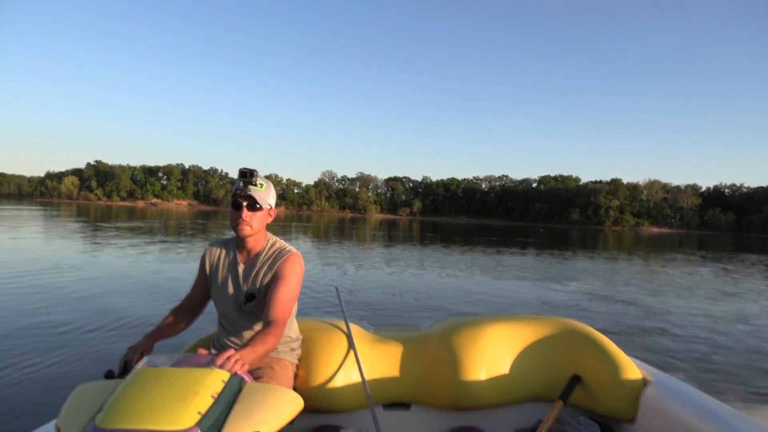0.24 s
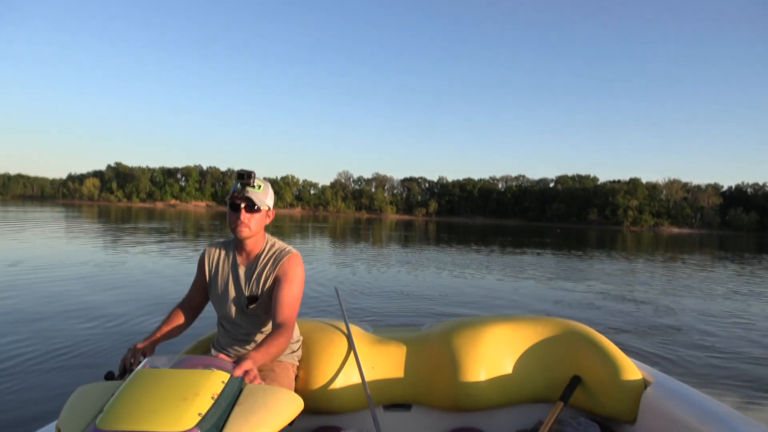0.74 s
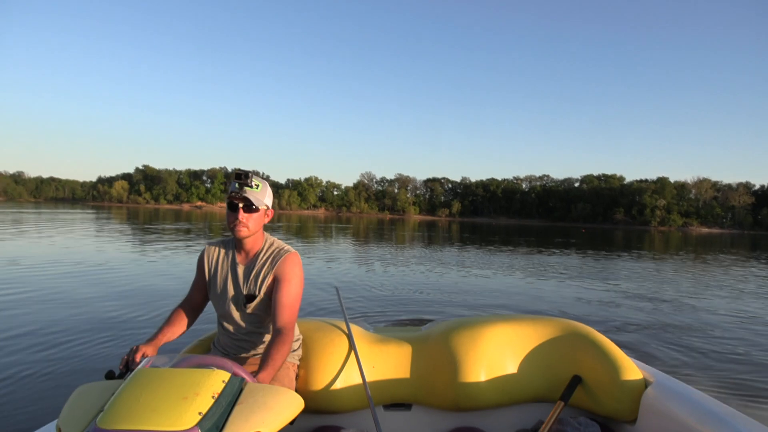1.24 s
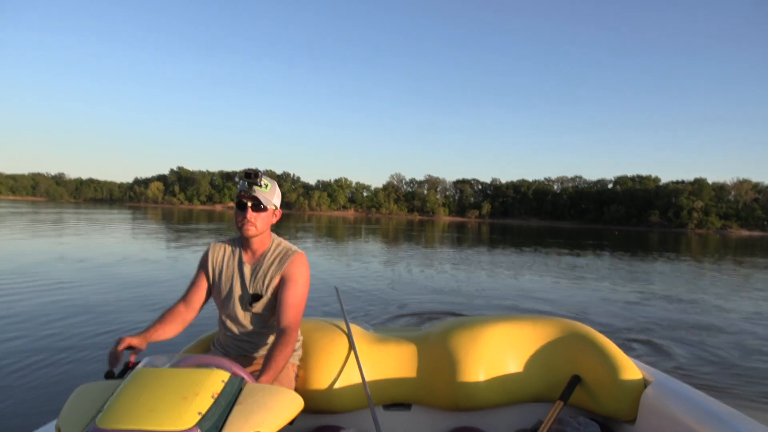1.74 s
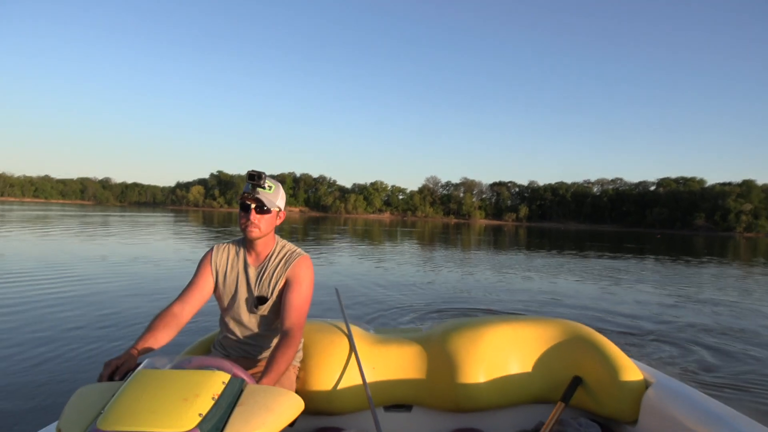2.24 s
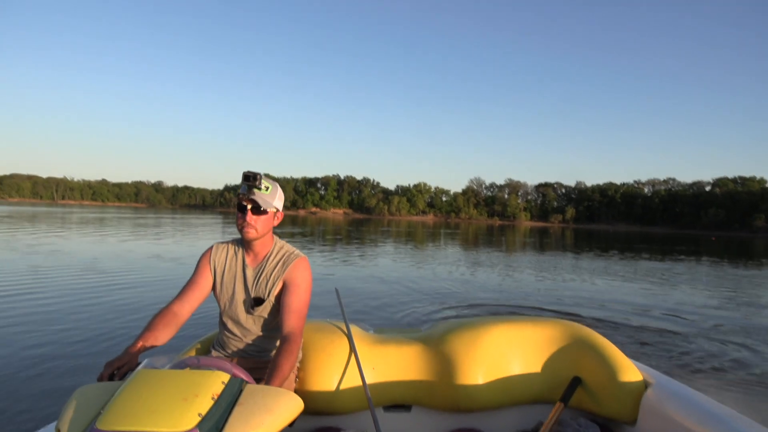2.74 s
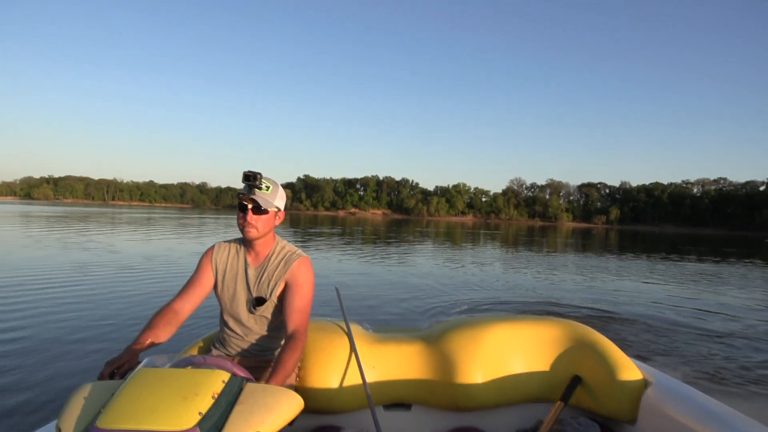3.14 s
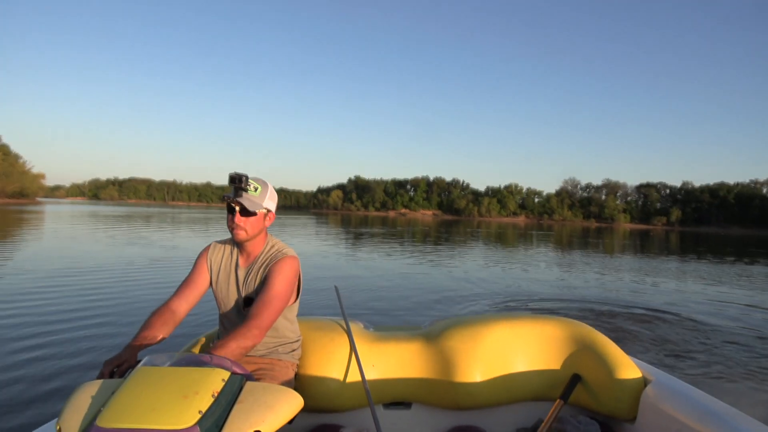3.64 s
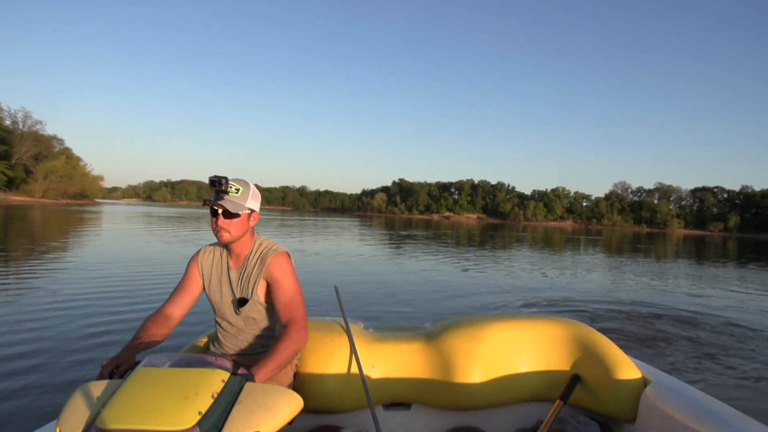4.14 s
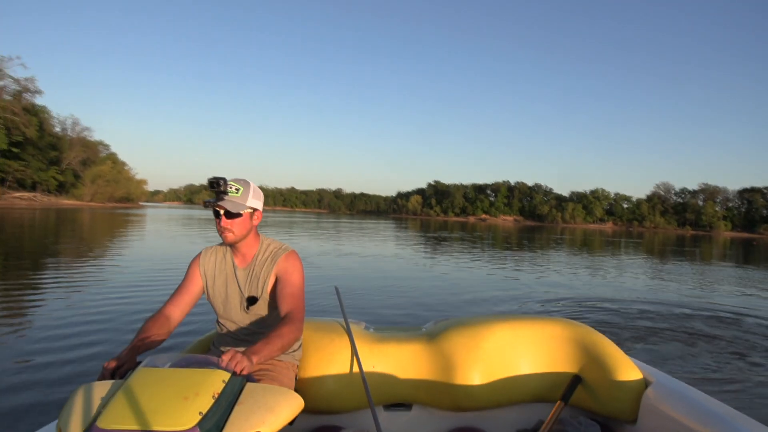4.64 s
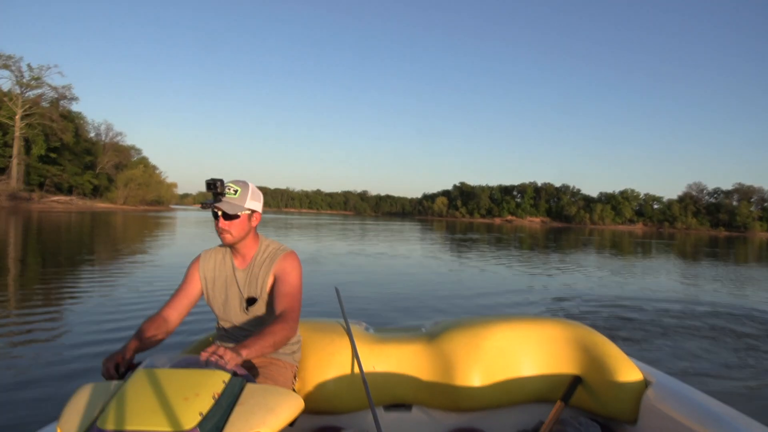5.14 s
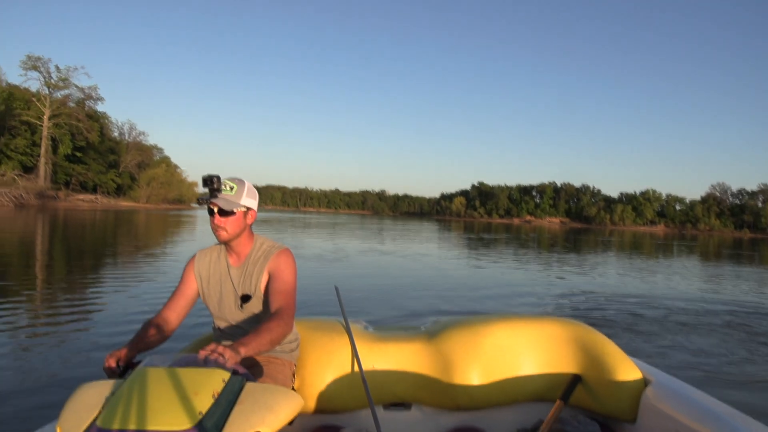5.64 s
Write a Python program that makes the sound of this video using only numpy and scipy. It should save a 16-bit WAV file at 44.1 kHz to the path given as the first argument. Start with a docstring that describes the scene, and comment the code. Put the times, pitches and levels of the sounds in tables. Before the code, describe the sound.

A steady boat engine throbs through hull and deck panels, swelling and fluttering without really changing speed. A shaken fitting ticks dryly and irregularly, with light churn and bubbling behind. A brief clatter comes around 4 seconds, then a sharper clack at 4.5; afterwards the ticks thin briefly and return regularly. Close, dry onboard sound outdoors, bass-heavy, with limiter distortion.

```python
"""An idling jet boat drones through its hull on a calm river: uneven firings and flow noise drive
resonances of hull, exhaust and deck panels, with steady tones, swells and low thumps on top.
Water fizzes at the stern as coloured noise and bubble blips; deck hardware buzzes.
Loose gear knocks, and a fitting shaken by the engine ticks: short noise bursts with decaying tones.
The loud drone drives the small microphone into its limiter and clipping."""
import sys
import numpy as np
from scipy.fft import rfft, irfft, next_fast_len
from scipy.io import wavfile
from scipy.ndimage import uniform_filter1d, minimum_filter1d, map_coordinates

SR = 44100
rng = np.random.default_rng(int(sys.argv[2]) if len(sys.argv) > 2 else 0)


def dump_mix(stems):
    """Bounce the given channels to the path in sys.argv[1] as a 16-bit WAV at rate SR."""
    frames = np.atleast_2d(stems).T  # one column per channel
    limited = np.clip(frames, -1, 1)  # hard clip at full scale
    pcm = np.round(limited * 32767).astype(np.int16)
    wavfile.write(sys.argv[1], SR, pcm)


N = 259308

FIRING_HZ = 58.13  # mean rate

# Water levels over time. Each row: time in seconds, spray, mist and churn level in dB.
WASH = [(0.0, -45, -59.5, -33), (0.55, -45.5, -63, -33.5), (0.82, -42.5, -57.5, -30.5),
        (1.1, -45.5, -61.5, -34.5), (1.4, -46, -56, -32.5), (1.82, -46, -62.5, -34), (2.2, -45, -61, -34),
        (2.6, -44, -62, -33), (3.55, -41.5, -58, -30.5), (3.94, -43, -55.5, -33), (3.97, -38, -53, -29),
        (4.16, -42, -55, -33), (4.47, -40.5, -54, -31.5), (4.72, -44.5, -56.5, -33), (4.87, -44, -57, -34),
        (5.04, -43.5, -52.5, -32), (5.2, -45, -58, -34), (5.4, -44.5, -57, -33), (5.65, -44.5, -54, -33),
        (5.88, -43.5, -56, -30.5)]


def amp(db):
    """dB to gain."""
    return 10 ** (np.asarray(db) / 20)


def unit(x):
    """Scaled to rms 1."""
    return x / np.sqrt(np.mean(x ** 2) + 1e-20)


def curves(rows):
    """One value per sample for each column after the time."""
    s, *cols = np.transpose(rows)
    return [np.interp(np.arange(N) / SR, s, c) for c in cols]


def wobble(rate):
    """A smooth random curve, rate knots a second."""
    knots = rng.standard_normal(int(N * rate / SR) + 4)
    return map_coordinates(knots, [np.arange(N) * rate / SR])


def filtered(x, response):
    """x times a complex response of frequency."""
    m = next_fast_len(N + SR // 2)
    return irfft(rfft(x, m) * response(np.fft.rfftfreq(m, 1 / SR)), m)[..., :N]


def colour(points):
    """Gain of (Hz, dB) points on a log frequency axis, -120 dB outside."""
    f, db = np.transpose(points)
    log_f = np.log(f + 1)
    return lambda hz: amp(np.interp(np.log(hz + 1), log_f, db, left=-120, right=-120))


def modes(table):
    """Causal response of (Hz, width Hz, dB) resonances, summed with alternating sign."""
    def response(f):
        total = 0
        for k, (c, w, db) in enumerate(table):
            total = total + (-1) ** k * amp(db) * 1j * f * w / (c * c - f * f + 1j * f * w)
        return total
    return response


def steady(x, span_s):
    """x with its slow level drift evened out by a running rms over span_s."""
    return x / np.sqrt(np.abs(uniform_filter1d(x ** 2, size=int(span_s * SR))) + 1e-9)


def add_at(track, s, piece):
    """Adds a piece to the track, starting at s seconds."""
    track[round(s * SR):][:len(piece)] += piece


def water():
    """Churn, spray and mist: noise bands that share level lumps and part of a grainy noise."""
    # Spectra of the three bands. Each row: frequency in Hz, relative gain in dB.
    churn, spray, mist = [(350, -10.5), (600, 0), (717, 1), (883, 1), (1350, -13.5), (1480, -36.5),
                          (1900, -38), (2470, -33), (4180, -120)], [(900, 0), (1500, 6.5), (1800, 6.5), (2500, -0.5), (2800, 0.5),
                                         (2970, -0.5), (3200, -2.5), (4300, -6), (4750, -7.5),
                                         (5200, -24.5), (6500, -40), (8450, -44)], [(3240, -23.5), (5500, 3.5), (6420, -1), (7460, -1),
                                                        (10800, -9.5), (13200, -21), (15800, -58)]
    spray_db, mist_db, churn_db = curves(WASH)
    lump = wobble(45)
    drops = unit(rng.standard_normal(N) * amp(5.5 * np.tanh(wobble(350) / 2.4)))
    bands = (  # level dB, spectrum, lump scale dB, share of drops
        (churn_db, churn, 1.8, .15),
        (spray_db, spray, 1.5, .35),
        (mist_db, mist, 1.5, .6))
    out = 0
    for level_db, spectrum, lump_db, share in bands:
        noise = filtered(rng.standard_normal(N) + share * drops, colour(spectrum))
        out = out + amp(level_db + lump_db * lump + 0.47 * wobble(22.16)) * unit(noise)
    return out


def bubbles():
    """Gurgle of small bubbles: soft sine blips that rise in pitch, following the spray level."""
    bubbles_per_s, start_hz, pitch_spread = 60, 3102, .25  # spread in log pitch
    life_cycles, level_db = 22, 1.5  # level re spray
    count, i = int(N / SR * bubbles_per_s), np.arange(SR // 40)
    at, draw = rng.integers(0, N, (count, 1)), rng.standard_normal((count, 2))
    cycles = start_hz * np.exp(pitch_spread * draw[:, :1]) * i / SR
    life = cycles / life_cycles
    envelope = amp(4.3 * draw[:, 1:]) * 8 * life * np.exp(-4 * life)
    blips = envelope * np.sin(2 * np.pi * cycles * (1 + .06 * life))
    track = np.bincount((at + i).ravel(), blips.ravel(), N + SR)[:N]
    return amp(curves(WASH)[0] + level_db) * track


def buzz():
    """Dense contacts (uneven noise) ring deck hardware, each part in its own fits; level follows spray."""
    # Hardware resonances. Each row: frequency in Hz, width in Hz, relative level in dB.
    hardware = [(1326, 110, 4.5), (1770, 130, 0), (2210, 65, 1), (2916, 79, 0.5), (3100, 170, -2),
                (3850, 200, -6), (4665, 98, -5), (5100, 56, -10.5), (5600, 150, -27), (7160, 160, -23)]
    unevenness_db = 9 * np.tanh(wobble(220) / 1.5) + 3.5 * np.tanh(wobble(30) / 1.5)
    contacts = rng.standard_normal(N) * amp(unevenness_db)
    parts = sum(amp(3 * wobble(30)) * filtered(contacts, modes([mode])) for mode in hardware)
    ring = filtered(parts, lambda hz: 1 / (1 + (1100 / (hz + 1)) ** 4) / (1 + (hz / 8000) ** 4))
    return amp(curves(WASH)[0] - 4.0) * unit(ring)


def clanks():
    """Loose gear knocks: a short noise clatter with a brief decaying sine at each knock's pitch."""
    # Knocks. Each row: start in seconds, level in dB, clatter T60 in seconds, ring pitch in Hz.
    knocks = [(1.459, -24, .03, 3100), (3.9584, -13, 0.075, 5300), (3.961, -21, 0.081, 2300),
              (3.967, -19.5, 0.088, 1190), (3.978, -25, 0.092, 1500), (4.017, -14.5, 0.087, 2800),
              (4.029, -23, 0.13, 3080), (4.057, -20, 0.13, 3080), (4.086, -18, 0.1, 1900),
              (4.102, -23, .09, 1200), (4.146, -21, 0.056, 1400), (4.512, -6.5, 0.033, 5300),
              (4.514, -9.5, .04, 690), (4.5155, -15, 0.023, 3650), (4.5177, -11.5, 0.07, 1320),
              (4.521, -13.5, .05, 2470), (4.523, -18, .04, 1910), (4.533, -18, 0.2, 1990),
              (4.575, -15.5, 0.043, 3860), (4.5762, -16, .04, 4720), (4.579, -17, .04, 2840),
              (4.578, -19, .04, 850), (4.584, -23, 0.083, 2010), (4.632, -23, .08, 2120)]
    # Clatter spectrum. Each row: frequency in Hz, relative gain in dB.
    spectrum = [(400, -4), (900, -1), (1600, -2.5), (2400, -3), (3500, -10), (5300, -8.5), (6500, -14.5),
                (9000, -20)]
    clatter_db, ring_db = -18.5, -6  # re knock level
    ring_cycles = 33  # cycles to -60 dB
    clatter, ring, t = np.zeros(N + SR), np.zeros(N + SR), np.arange(SR // 5) / SR
    rise = 1 - np.exp(-t / 0.00071)
    for s, db, t60, hz in knocks:
        add_at(clatter, s, rise * amp(db + clatter_db - 60 * t / t60))
        ring_gain = rise * amp(db + ring_db - 60 * t * hz / ring_cycles)
        add_at(ring, s, ring_gain * np.sin(2 * np.pi * hz * t))
    noise = unit(filtered(rng.standard_normal(N), colour(spectrum)))
    return clatter[:N] * noise + ring[:N]


def faint_ticks():
    """Light contacts at random, at most one per mean firing period, in the columns of the firm ones."""
    contacts_per_s, scatter_db = 9, 1.5
    level_db, body_db, edge_db = -44.5, 8, -15  # body and edge re level
    count = int(N / SR * FIRING_HZ)
    chance, draw = rng.random((count, 2)), rng.standard_normal((count, 3))
    s = (np.arange(count) + chance[:, 1] / 2) / FIRING_HZ
    levels_db = [level_db, body_db, edge_db] + scatter_db * draw
    kept = chance[:, 0] < contacts_per_s / FIRING_HZ
    return list(np.column_stack([s, levels_db])[kept])


def ticks():
    """A fitting's contacts: noise burst of a few ms, one bounce, tail, and modes of random strength."""
    # Firm contacts. Each row: start in seconds, level in dB, body and edge in dB re level.
    firm = [(0.0513, -25, -3, -11.5), (0.069, -38, 2, -15.5), (0.0892, -32.5, -5, -13),
            (0.1174, -39, 8.5, -11.5), (0.164, -38, -4, -13.5), (0.2076, -30.5, -7, -12),
            (0.248, -38.5, 5, -16), (0.266, -39.5, 7, -16), (0.3575, -33, -0.5, -13.5),
            (0.3795, -35, -11.5, -21.5), (0.3995, -46, 7, -17), (0.4469, -40.5, 1, -14),
            (0.496, -33.5, 2, -15.5), (0.506, -38.5, 5, -15), (0.516, -37.5, 7.5, -13.5),
            (0.6522, -39.5, 5, -15.5), (0.669, -43.5, 9, -16), (0.7068, -50, 4, -20),
            (0.7868, -28.5, -5, -13), (0.827, -37, 9.5, -13), (0.905, -33, 5.5, -12.5),
            (0.97, -47, -2, -13), (0.9926, -39, 0, -17), (1.0954, -40, 5, -16.5), (1.1927, -38, 6, -16.5),
            (1.2342, -34, 3.5, -17.5), (1.203, -44.5, 7, -19.5), (1.2625, -37.5, 2, -21),
            (1.349, -40.5, 12, -18), (1.356, -44, 8, -18), (1.388, -41, 1, -17.5), (1.4531, -39, 9, -17.5),
            (1.4852, -35, 2, -12), (1.508, -26.5, -10, -9.5), (1.571, -37, 0.5, -17),
            (1.6093, -34, -2, -15), (1.624, -39, 7, -12.5), (1.729, -42, 7.5, -16.5),
            (1.8063, -45, -1.5, -14), (1.8582, -40.5, 6.5, -18), (1.907, -45, 0, -14),
            (2.0098, -42.5, 3, -15), (2.029, -41, -2, -15), (2.0567, -40, 6, -17), (2.1044, -26, -8, -12),
            (2.149, -40, -5, -14), (2.1778, -44, 8, -8.5), (2.2039, -33.5, -9, -14),
            (2.2493, -35.5, -11, -13.5), (2.3141, -34.5, -1, -14.5), (2.36, -38, -2, -17.5),
            (2.6269, -36, -2, -11), (2.64, -38.5, 6, -17.5), (2.654, -49, -3, -21), (2.7227, -37, 4, -16),
            (2.752, -38.5, 7, -14), (2.851, -22.5, -7, -13), (2.8809, -37.5, -10.5, -9.5),
            (2.9034, -28.5, -20, -16), (2.964, -37, -6, -21), (3.019, -32, -4, -14),
            (3.046, -29, -12, -13.5), (3.1403, -28, -8.5, -15.5), (3.1922, -29.5, -12, -12.5),
            (3.249, -29.5, -15, -13.5), (3.294, -29, -1, -12), (3.3508, -35, -12, -18),
            (3.359, -34, -6, -16), (3.4038, -28.5, -1, -11), (3.454, -31, -8, -18), (3.5044, -40, 6, -21),
            (3.5525, -37, 5, -19), (3.614, -33.5, 2.5, -10), (3.6376, -25, -6, -14), (3.688, -31, -1, -12),
            (3.703, -34.5, 1, -15.5), (3.7229, -35, -6, -14), (3.748, -30, 5.5, -10),
            (3.788, -26.5, -2, -17), (3.8402, -35.5, -3, -12), (3.9594, -30, -9, -15),
            (3.9968, -26.5, -3, -8.5), (4.0164, -35.5, -5, -13), (4.029, -43, 0, -16), (4.0577, -37, 4, -8),
            (4.0855, -27.5, -7, -7), (4.104, -37, 3, -11), (4.13, -34, 3.5, -12.5), (4.149, -38, 2, -12.5),
            (4.179, -34, -10, -15.5), (4.194, -38.5, -3, -10), (4.2238, -33, -10, -21),
            (4.2443, -31.5, -2, -16.5), (4.259, -36, -2, -14), (4.2786, -31.5, -7, -14.5),
            (4.322, -40, 0, -12.5), (4.339, -39, 0, -15), (4.392, -40.5, 4, -16), (4.4139, -35, 0, -9.5),
            (4.438, -39.5, 2, -14), (4.4715, -30.5, -5, -12), (4.486, -32, -1, -12),
            (4.5106, -23, -11, -21.5), (4.5755, -30.5, 3, -25), (4.6244, -31, -4, -14.5),
            (4.9082, -36, -5, -16), (4.9606, -34.5, -6, -12), (5.0723, -29.5, -0.5, -13),
            (5.1277, -29, -9, -12), (5.231, -43, -2, -14), (5.3103, -30, -4, -11), (5.3792, -39, -7, -10.5),
            (5.392, -43, -3.5, -7), (5.4156, -33.5, 0, -16.5), (5.473, -32.5, -3, -8),
            (5.5253, -30.5, -4, -12), (5.5733, -31.5, -13, -14), (5.6238, -28, -8, -12),
            (5.675, -28.5, -4, -14), (5.7277, -28.5, -11, -13), (5.7786, -30.5, -5, -12.5),
            (5.8325, -28, -7, -12)]
    # Fitting modes. Each row: frequency in Hz, relative level in dB, T60 in seconds.
    fitting = [(1376, 2.5, 0.039), (1870, 0, 0.043), (2250, -16, 0.036), (3120, -8.5, 0.03),
               (3500, -7, 0.04), (4430, -15.5, 0.061), (5500, -9, 0.044), (6750, -22, 0.012),
               (7430, -6.5, 0.037), (10100, 2, 0.012), (10500, -6, .03)]
    # Spectra of tick middle, body and edge. Each row: frequency in Hz, relative gain in dB.
    middle, body, edge = [(3000, -17.5), (4500, 3.5), (6000, 0.5), (7400, 2), (8500, -2.5), (10000, -2.5)], [(700, -20.5), (1200, 1), (2000, 4.5), (3000, 1), (4200, -0.5),
                                          (5300, -6.5), (6200, -30.5)], [(8000, -25.5), (9200, -15.5), (10600, 3.5),
                                                        (12000, -4), (14000, -9.5), (16000, -16)]
    shapes, ring, t = np.zeros((3, N + SR)), np.zeros(N + SR), np.arange(SR // 12) / SR
    hz, mode_db, mode_t60 = np.transpose(fitting)[:, :, None]
    tones = np.sin(2 * np.pi * hz * t)
    rise = (1 - np.exp(-t / .0004)) ** 2
    contacts = list(firm) + faint_ticks()
    draws = rng.standard_normal((len(contacts), 4 + len(fitting)))
    for (s, db, body_db, edge_db), draw in zip(contacts, draws):
        blow_t60 = 0.0097 * np.exp(0.39 * draw[2])
        blow = rise * amp(-60 * np.maximum(t - .0025, 0) / blow_t60)  # held 2.5 ms
        bounce_s = 0.011 * np.exp(0.5 * draw[1])
        bounce = amp(-12.0 + 1.8 * draw[0]) * np.roll(blow, int(SR * bounce_s))
        at = slice(round(s * SR), round(s * SR) + len(t))
        tails = amp([[-12], [-13], [-18]] + 3.5 * draw[3] - 60 * t / 0.077)  # weakest in the edge
        band_gain = amp([[db], [db + body_db], [db + edge_db]])
        shapes[:, at] += band_gain * (blow + bounce + rise * tails)
        strength_db = db + mode_db + 3.1 * draw[4:, None]
        strength_db = strength_db + (hz < 4000) * body_db + (hz > 9000) * edge_db
        ring[at] += rise * np.sum(amp(strength_db - 60 * t / mode_t60) * tones, axis=0)
    noise = [unit(filtered(rng.standard_normal(N), colour(c))) for c in (middle, body, edge)]
    bursts = np.sum(amp([[-9], [-5], [-8]]) * shapes[:, :N] * noise, axis=0)
    return bursts + amp(-10.0) * ring[:N]


def thumps():
    """Low thumps in the hull: a short low decaying sine each."""
    # Thumps. Each row: start in seconds, level in dB, pitch in Hz.
    thump_rows = [(0.465, -2, 218), (0.589, 1.5, 221.5), (0.715, 1, 195.7), (0.76, 0, 199), (0.88, 0, 240),
                  (0.939, -1, 229), (1.137, 1, 222), (2.105, -0.5, 211), (2.309, 0, 236),
                  (2.424, -0.5, 209.5), (2.707, -0.5, 213), (2.979, -0.5, 208), (4.211, -3, 274),
                  (4.666, -1, 202), (5.077, -3, 229), (5.228, -2, 201)]
    rise_s, t60_s, offset_db = .005, 0.097, -2
    out, t = np.zeros(N + SR), np.arange(SR // 8) / SR
    rise = 1 - np.exp(-t / rise_s)
    for s, db, hz in thump_rows:
        gain = amp(db + offset_db - 60 * t / t60_s) * rise
        add_at(out, s, gain * np.sin(2 * np.pi * hz * t))
    return out[:N]


def strands():
    """The least damped modes hold fluttering tones; firing overtones share one wavering phase."""
    # Sharpest exhaust and hull tones. Each row: frequency in Hz, level in dB.
    sharp_tones = [(93, -27), (220, -23)]
    # Overtones of the firing rate. Each row: multiple, level in dB.
    orders = [(2, -29.5), (3, -27), (4, -23), (5, -30.5), (7, -29), (8, -33), (9, -37.5)]
    t = np.arange(N) / SR
    out = 0
    for hz, db in sharp_tones:
        out = out + amp(db + 2.5 * wobble(9)) * np.sin(2 * np.pi * hz * t + 1.35 * wobble(11))
    cycle = 2 * np.pi * FIRING_HZ * t + .3 * wobble(8)
    for k, db in orders:
        out = out + amp(db + 4.3 * wobble(13)) * np.sin(round(k) * cycle + k * k)
    return out


def firings(scatter, size_db):
    """One impulse per firing, uneven in time (scatter in periods) and strength."""
    draw = rng.standard_normal((int(N / SR * FIRING_HZ), 2))
    at = (np.arange(len(draw)) + scatter * draw[:, 0]) * SR / FIRING_HZ
    return unit(np.bincount(np.clip(at, 0, N - 1).astype(int), amp(size_db * draw[:, 1]), N))


def swells():
    """Gain added to the hull drone by brief swells: a quick rise, then a decay."""
    # Swells. Each row: start in seconds, level in dB.
    swell_rows = [(0.056, 0), (0.207, -4.5), (0.262, -2), (0.303, -3), (0.384, 0), (0.467, 0.5),
                  (0.528, 0.5), (0.589, 1), (0.654, 1), (0.716, -5.5), (0.761, 3), (0.813, -5), (0.88, 4.5),
                  (0.94, -5.5), (1.136, 1.5), (1.206, -12), (1.271, -1.5), (1.334, -2), (1.43, -3),
                  (1.465, 1), (1.615, -5), (1.726, -8), (1.765, -5), (1.837, -12), (1.972, -9), (2.024, -1),
                  (2.105, 1), (2.135, -13), (2.231, -2.5), (2.309, -0.5), (2.362, -2), (2.424, 0.5),
                  (2.459, 2), (2.547, -1.5), (2.578, -15), (2.619, -8), (2.706, -4), (2.813, -11),
                  (2.897, -2), (2.976, 4), (3.063, -7), (3.104, 1.5), (3.205, -8), (3.256, -1.5),
                  (3.311, -8), (3.388, 2.5), (3.479, 0), (3.518, -2.5), (3.629, -7), (3.665, -2),
                  (3.761, 0.5), (3.802, -3.5), (3.916, -3.5), (3.943, -5), (3.975, -7), (4.093, -3),
                  (4.141, -7), (4.211, -0.5), (4.316, -0.5), (4.398, -3), (4.457, -2.5), (4.517, -8),
                  (4.576, -5), (4.61, -5), (4.667, -0.5), (4.735, -4), (4.812, -5), (4.882, -3),
                  (4.934, -4.5), (4.998, -9), (5.063, 1), (5.141, 7.5), (5.227, -3), (5.354, 0),
                  (5.43, 2.5), (5.493, -6), (5.594, -5), (5.681, 2), (5.718, -10), (5.751, 5.5)]
    rise_s, t60_s, offset_db = 0.0038, .17, -5
    gain, t = np.zeros(N + SR), np.arange(SR // 5) / SR
    rise = 1 - np.exp(-t / rise_s)
    for s, db in swell_rows:
        add_at(gain, s, amp(db + offset_db - 60 * t / t60_s) * rise)
    return gain[:N]


def engine():
    """Firings and turbulent flow shake the resonances of the hull, the wet exhaust and the deck panels."""
    # Drive over time. Each row: time in seconds, hull drone, exhaust throb and panel hum level in dB.
    drive = [(0, -11, -19.5, -19.5), (.3, -18.5, -18.5, -20), (.65, -11.5, -19, -20.5),
             (1.3, -14.5, -20, -20.5), (1.9, -14, -21.5, -21.5), (2.5, -14, -19, -21.5),
             (3.1, -12.5, -18.5, -18.5), (3.9, -12.5, -18, -19.5), (4.5, -13.5, -16.5, -17.5),
             (5.2, -14.5, -17, -19), (5.88, -12, -23, -19)]
    # Resonances of each part. Each row: frequency in Hz, width in Hz, relative level in dB.
    hull, pipe, panel = [(158.6, 49, -9.5), (185.9, 16.4, -1.5), (197.6, 19, 0), (222.1, 19.5, 0.5),
                         (234.4, 18.1, 1), (277, 94.7, -10.5)], [(51.5, 7.2, -12), (81, 48.5, -8.5), (92, 27.5, -2.5),
                                       (116.6, 34, -9.5)], [(370.5, 82.4, -4.5), (403.9, 29.4, 1.5),
                                                     (462.1, 17, -1.5), (523.4, 46.7, -5.5),
                                                     (617, 220, -21.5)]
    calm_db = -1  # hull offset between swells
    wander, wanders_per_s = 0.012, 5  # slow random drift of all resonances: share of pitch, rate
    blows = firings(scatter=0.2603, size_db=4)
    hull_db, exhaust_db, panel_db = curves(drive)
    hull_gain = np.hypot(amp(hull_db + calm_db), swells())
    turn = np.pi / 4 * (1 + np.tanh(wobble(wanders_per_s)))  # crossfade, low to high tuning
    parts = (  # gain, random level scale dB, its rate per s, modes, share of blows, levelling span s
        (hull_gain, 1.82, 30, hull, .35, .03),
        (amp(exhaust_db), 1.5, 14, pipe, .3, .12),
        (amp(panel_db), 1.5, 18, panel, .2, .12))
    out = 0
    for gain, surge_db, rate, table, share, span_s in parts:
        push = share * blows + rng.standard_normal(N)  # noise is the flow
        response = modes(table)
        low = filtered(push, lambda hz: response(hz * (1 + wander)))
        high = filtered(push, lambda hz: response(hz * (1 - wander)))
        tone = unit(steady(np.cos(turn) * low + np.sin(turn) * high, span_s))
        out = out + gain * amp(surge_db * wobble(rate)) * tone
    return filtered(out, lambda hz: 1 / (1 + (42 / (hz + 1)) ** 4) / (1 + (hz / 750) ** 4))


def scene():
    """Everything heard at the helm."""
    background = water() + bubbles() + buzz() + clanks() + ticks()
    return (background + thumps() + strands() + engine())[None]


def record(dry):
    """A quick limiter with its ceiling just above full scale, hard clipping at 1, then a band limit."""
    ceiling, window_s, top_hz = 1.12, .012, 15900
    size = int(window_s * SR)
    needed_gain = ceiling / np.maximum(np.abs(dry), ceiling)
    gain = uniform_filter1d(minimum_filter1d(needed_gain, size=size), size=size)
    return filtered(np.clip(dry * gain, -1, 1), lambda hz: hz < top_hz)


dry = scene()
out = record(dry)
dump_mix(out)
```